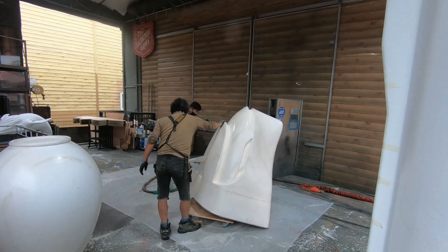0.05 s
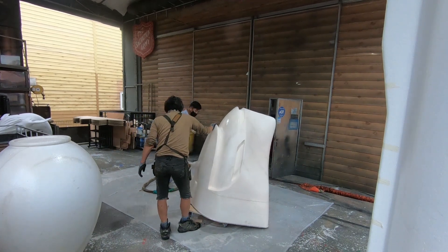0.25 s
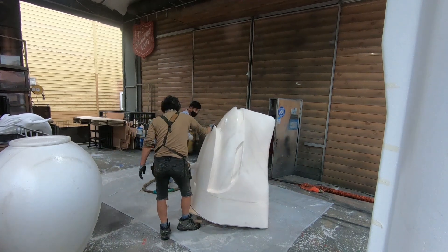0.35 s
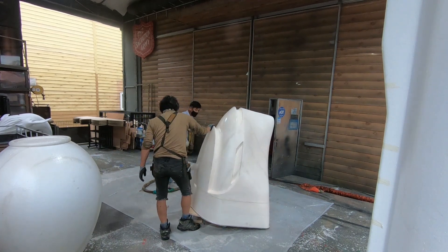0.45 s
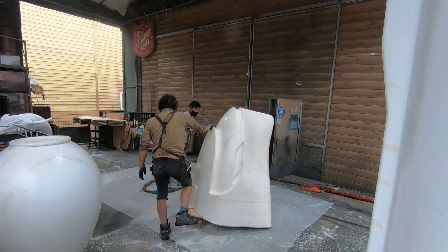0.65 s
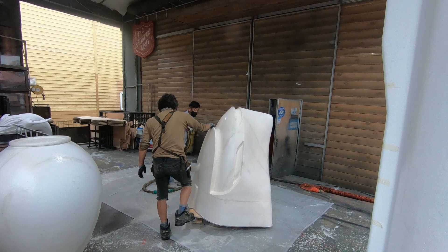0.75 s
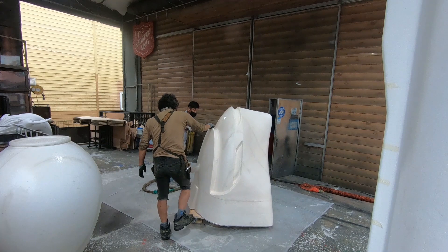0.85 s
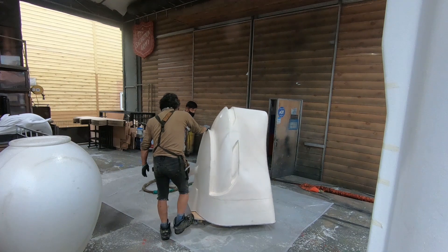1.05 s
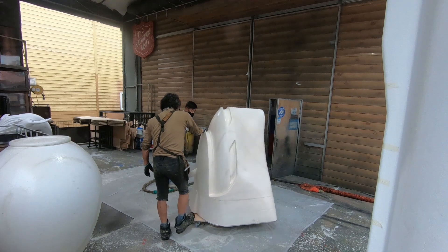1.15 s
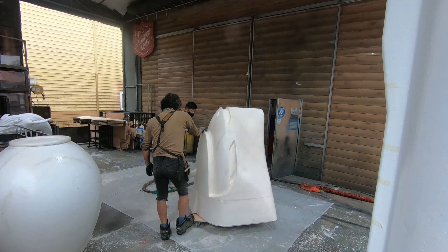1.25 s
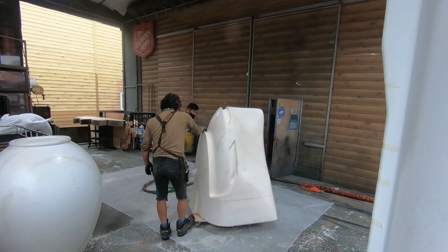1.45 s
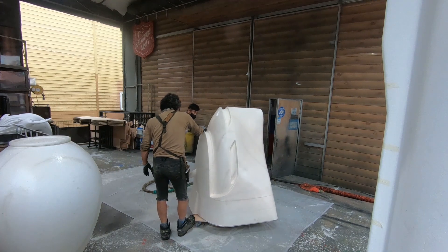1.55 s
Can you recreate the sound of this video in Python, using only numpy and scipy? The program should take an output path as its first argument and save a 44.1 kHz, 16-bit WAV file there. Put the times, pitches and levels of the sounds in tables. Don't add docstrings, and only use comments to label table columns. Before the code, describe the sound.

A big hollow sculpture drops onto concrete with a sharp crack and boom, then rocks down softer.

```python
import sys
import numpy as np
from scipy import signal
from scipy.fft import rfft, irfft
from scipy.io import wavfile
from scipy.ndimage import uniform_filter1d

SR = 44100
rng = np.random.default_rng(int(sys.argv[2]) if len(sys.argv) > 2 else 0)


def elevation(decibels):
    levels = np.asarray(decibels, float)
    return 10 ** (levels / 20)


def int16_out(signal):
    q = np.round(np.clip(np.atleast_2d(signal).T, -1, 1) * 32767)
    wavfile.write(sys.argv[1], SR, q.astype(np.int16))


N = 70560
T = np.arange(N) / SR


def curve(table, hz):
    table = np.array(table, float)
    return np.interp(np.log(np.maximum(hz, 1)), np.log(table[:, 0]), table[:, 1])


def level(x, db):
    return x * elevation(db) / np.sqrt(np.mean(x ** 2))


def noise(colour, fall_db=18):
    hz = np.maximum(np.arange(N // 2 + 1) * SR / N, 1)
    octaves_below = np.maximum(np.log2(colour[0][0] / hz), 0)
    octaves_above = np.maximum(np.log2(hz / colour[-1][0]), 0)
    gain = elevation(curve(colour, hz) - fall_db * (octaves_below + octaves_above))
    return level(irfft(rfft(rng.standard_normal(N)) * gain, N), 0)


def walk(rate):
    hold = int(SR / rate)
    steps = np.repeat(rng.standard_normal(N // hold + 1), hold)
    drift = uniform_filter1d(uniform_filter1d(steps, hold), hold)[:N]
    return drift / drift.std()


def add_mode(out, start, hz, t60, rise, db):
    i = int(start * SR) + 1
    t = T[i:i + int(t60 * SR) + 1] - start
    push = np.sin(np.pi / 2 * np.minimum(t / rise, 1)) ** 2
    out[i:i + len(t)] -= np.sin(2 * np.pi * hz * t) * elevation(db - 60 * t / t60) * push


# [t/s, level/dB, f/Hz, t60/s]
BOUNCES = [(0.2236, -8.5, 165, 0.13), (.2262, -10, 323, .11), (.2435, -6, 192, 0.1),
           (0.2551, -10, 261, 0.048), (0.264, -19.5, 39.8, 0.16), (.273, -2.5, 189, 0.057),
           (0.27, -23.5, 95.2, 0.073), (0.2959, -6, 146.5, .17), (0.326, -12, 135.3, 0.16),
           (.34, -19.5, 206.3, 0.22), (.39, -30, 48.4, 0.5), (.436, -31, 173.9, 0.3),
           (0.442, -26, 95.7, 0.089), (0.825, -42, 166, 0.25), (1.234, -21.5, 285, .1),
           (1.247, -22, 323.6, 0.085), (1.24, -23, 206, 0.11), (1.257, -19.5, 121, .12),
           (1.263, -23, 38.5, 0.22), (1.294, -26.5, 287, 0.19), (1.3105, -16, 157.8, .17),
           (1.317, -26, 88.5, 0.079), (1.371, -28.5, 164.7, 0.19), (1.419, -34.5, 147.7, 0.43),
           (1.414, -31, 58.3, 0.27), (1.458, -28.5, 151.3, 0.22), (1.514, -33.5, 135, 0.13),
           (1.547, -44, 154, .1), (1.576, -56, 146, 0.077)]


def thuds():
    out = np.zeros(N)
    for s, db, hz, t60 in BOUNCES:
        add_mode(out, s, hz, t60, 0.45 / hz, db)
    return out


# [t/s, level/dB, treble tilt/dB per octave]
EDGE_HITS = [
    (.2233, 3.5, 1.3),
    (.2305, -6, -3),
]
# [f/Hz, level/dB, t60/s]
EDGE_MODES = [(700, -14.5, 0.012), (1200, -7.5, 0.037), (1442, -1.5, 0.035), (1560, -1, 0.01),
              (1985, -1.5, 0.021), (2727, -7, 0.014), (3214, -14, 0.018), (4000, -15.5, .01),
              (4910, -22, 0.012), (6200, -30.5, 0.0091)]


def cracks():
    mix, out = rng.standard_normal((len(EDGE_HITS), len(EDGE_MODES))), np.zeros(N)
    mix[0] = 0
    for hit_mix, (s, db, tilt_db) in zip(mix, EDGE_HITS):
        for m, (hz, mode_db, t60) in zip(hit_mix, EDGE_MODES):
            hit_db = db + mode_db - 12 + 3 * m + tilt_db * np.log2(hz / 1400)
            add_mode(out, s, hz * (1 + 0.06 * m), t60, 0.0007, hit_db)
    return out


# [t/s, level/dB]
SLIPS = [
    (.203, -50),
    (0.211, -40),
    (0.219, -34),
]


def squeak():
    squeak_hz, squeak_s = 2530, 0.0057
    out = np.zeros(N)
    for s, db in SLIPS:
        tone = np.sin(2 * np.pi * (squeak_hz * T + 0.14 * walk(900)))
        out += elevation(db) * tone * np.exp(-((T - s) / squeak_s * 2) ** 2)
    return out


# [t/s, level/dB, centre f/Hz, width/Hz, t60/s]
CRUNCHES = [(.226, -23.5, 1760, 1410, 0.036), (0.247, -40, 2730, 1920, 0.045),
            (0.269, -37.5, 3750, 2830, 0.23), (0.404, -48, 3000, 4000, 0.037),
            (.495, -56.5, 1960, 3020, 0.069), (.612, -54.5, 1800, 2500, .04), (.842, -49, 1580, 354, 0.041),
            (1.232, -37.5, 2150, 1800, 0.055), (1.235, -32.5, 1090, 700, 0.084),
            (1.244, -39.5, 3720, 2900, 0.027), (1.256, -33, 727, 150, 0.09),
            (1.292, -45.5, 2800, 3400, 0.088), (1.294, -40.5, 980, 493, 0.099),
            (1.317, -49, 2800, 2000, 0.033), (1.337, -37.5, 1060, 595, 0.041),
            (1.335, -43, 2050, 400, 0.025), (1.381, -50.5, 3600, 1200, 0.049)]


def grit():
    out, rough = np.zeros(N), rng.standard_normal(N)
    for s, db, hz, width_hz, t60 in CRUNCHES:
        i, n = int(s * SR), int(t60 * SR)
        b, a = signal.iirpeak(hz, hz / width_hz, SR)
        rung = signal.lfilter(b, a, signal.lfilter(b, a, rough[i:i + n]))
        out[i:i + n] += level(rung, db) * elevation(-60 * T[:n] / t60) * np.minimum(T[:n] / 0.0017, 1)
    return signal.sosfilt(signal.butter(6, 5380, fs=SR, output="sos"), out)


# [f/Hz, t60/s]
HALL_DECAY = [(60, 0.55), (250, 0.4676), (1000, 0.4629), (4000, 0.36)]


def hall(colour, tilt_db=0.):
    build_s = 0.012
    t, hz, out = T[:SR], np.arange(1, SR // 2 + 2), 0
    spectrum = rfft(rng.standard_normal(SR))
    for centre in 30 * 2 ** np.arange(0, 8.5, 0.5):
        band = irfft(spectrum * np.clip(1 - 2 * np.abs(np.log2(hz / centre)), 0, 1), SR)
        start_db = curve(colour, centre) + tilt_db * np.log2(centre / 300)
        out = out + band * elevation(start_db - 60 * t / curve(HALL_DECAY, centre))
    return out * (1 - np.exp(-(t / build_s) ** 2))


# [t/s, tail level/dB, treble tilt/dB per octave]
BLOWS = [
    (.224, -3.5, 1.32),
    (.262, -5.5, 1.53),
    (.47, -26.5, 0),
    (1.234, -13, -1.5),
    (1.3, -14.5, -3.5),
]
# [f/Hz, level/dB]
HALL_COLOUR = [(40, -12.5), (160, -5), (300, -2.5), (510, -12), (1000, -19.5), (2070, -29.5), (4800, -43.5),
               (7500, -76)]


def tails(boom):
    wet_db, tail_db = -11, 9.5
    smear = hall([(20, 0), (200, 0), (2000, -40)])
    smear = smear / np.sqrt(np.sum(smear ** 2)) / 10
    out = elevation(wet_db) * signal.fftconvolve(boom, smear)[:N]
    for s, db, tilt_db in BLOWS:
        tail = elevation(db + tail_db) * hall(HALL_COLOUR, tilt_db)
        out = out + np.pad(tail, (int(s * SR), N))[:N]
    return out


# [t/s, level/dB]
SCUFF_PRESSURE = [
    (0, -40),
    (0.019, -45),
    (0.048, -44.5),
    (.12, -52.5),
    (.22, -55.5),
    (.5, -65),
    (.75, -66),
    (1.0, -59.5),
    (1.6, -59),
]
# [f/Hz, level/dB]
SCUFF_COLOUR = [(800, -5), (2000, -4.5), (2800, -9), (4100, 2), (7000, -14), (9000, -23), (12500, -36.5),
                (15600, -36)]


def scuff():
    s, db = np.array(SCUFF_PRESSURE).T
    return noise(SCUFF_COLOUR) * elevation(np.interp(T, s, db) + 0.98 * walk(25) + 0.9 * walk(300))


# [f/Hz, level/dB]
CASTORS = [(30, 7), (60, 1), (120, 1.5), (200, -4), (380, -11.5)]


def castors():
    return noise(CASTORS) * elevation(-43) * np.exp(-((T - 0.11) / 0.11) ** 2)


# [f/Hz, rms level/dB]
FRIDGE = [(59.2, -63), (118.4, -53.5), (349.9, -61), (403, -61), (452.2, -54.5), (538.3, -64)]


def fridge():
    wobble_db, surge_db, surge_s = 3.5, 14, 0.22
    surge = np.exp(-((T - surge_s) / 0.18) ** 2)
    out = np.zeros(N)
    for hz, db in FRIDGE:
        partial_db = db + wobble_db * walk(9) + surge_db * surge * (100 < hz < 130)
        tone = np.sin(2 * np.pi * (hz * T + 0.03 * walk(6.5)))
        out += np.sqrt(2) * elevation(partial_db) * tone
    return out


# [f/Hz, density/dB per Hz]
AIR = [(25, 0.5), (60, -4.5), (160, 2), (280, -5.5), (450, -4), (750, -17), (1300, -25.5), (2800, -43.5)]
# [f/Hz, level/dB]
HISS = [(5000, -1.5), (8000, -5), (10800, -20), (11600, -14.5), (12400, -6), (15600, -17)]
# [t/s, level/dB]
HISS_SWAY = [
    (0, 0),
    (.05, 10),
    (.2, 5),
    (.24, 2),
    (.7, -0.5),
    (1.0, 3),
    (1.6, 4),
]


def air():
    rumble = noise(AIR, 8) * elevation(-47 + 0.37 * walk(1.6))
    hiss = noise(HISS) * elevation(-63 + np.interp(T, *np.array(HISS_SWAY).T))
    return rumble + hiss


def scene():
    boom = thuds()
    sculpture = boom + cracks() + squeak() + grit()
    background = scuff() + castors() + fridge() + air()
    return (sculpture + tails(boom) + background)[None]


def top_cut(x):
    return signal.sosfilt(signal.butter(12, 15700, fs=SR, output="sos"), x)


def record(dry):
    top_hz = 15700
    spectrum = rfft(dry)
    spectrum[:, int(top_hz * N / SR):] = 0
    return top_cut(irfft(spectrum, N))


dry = scene()
out = record(dry)
int16_out(out)
```